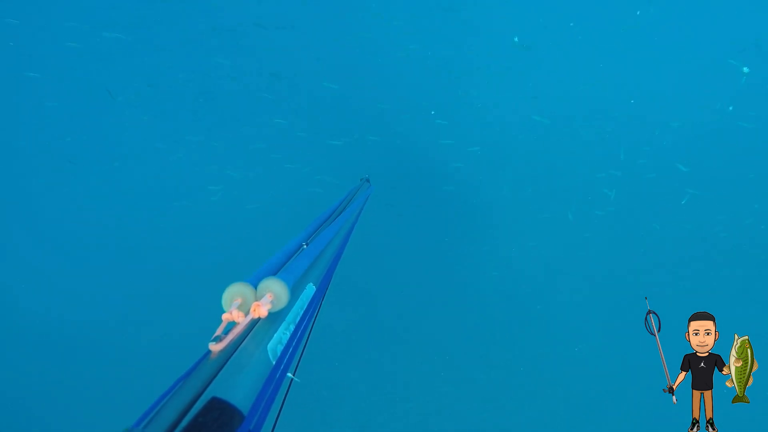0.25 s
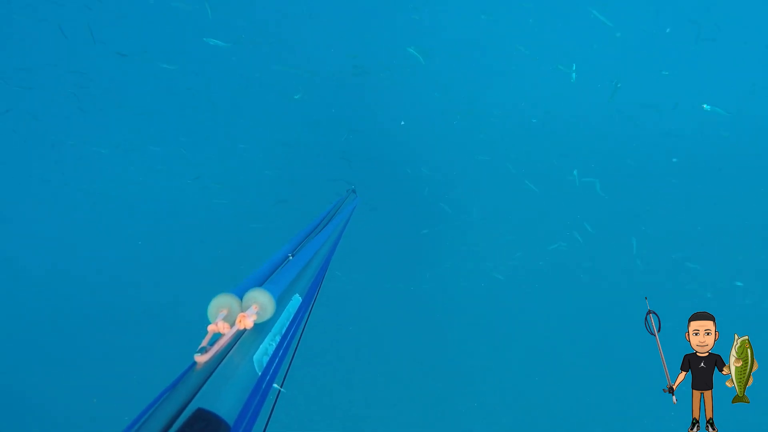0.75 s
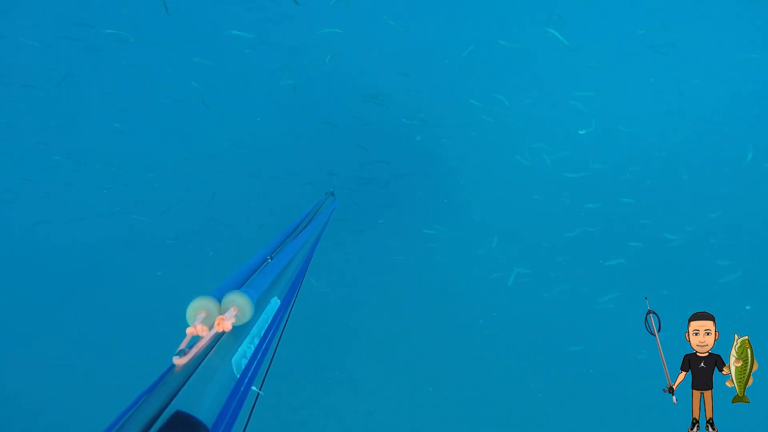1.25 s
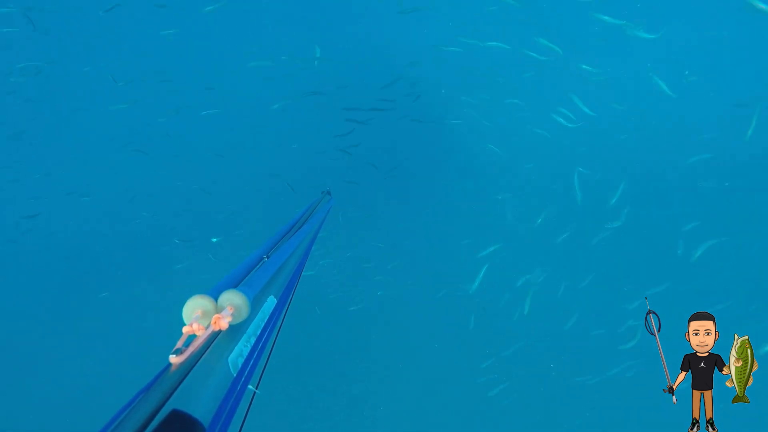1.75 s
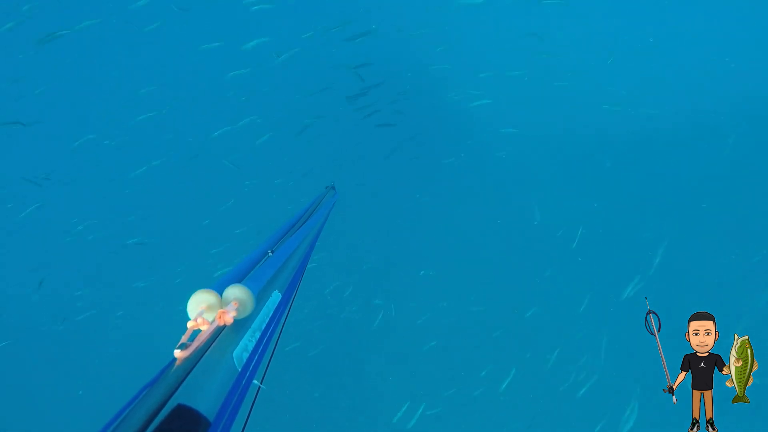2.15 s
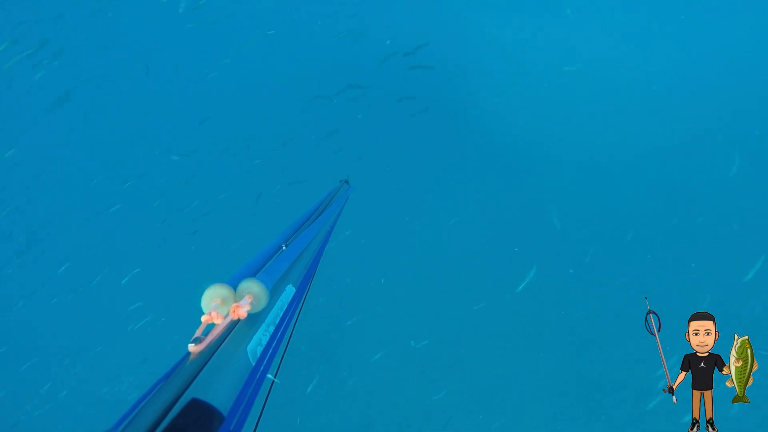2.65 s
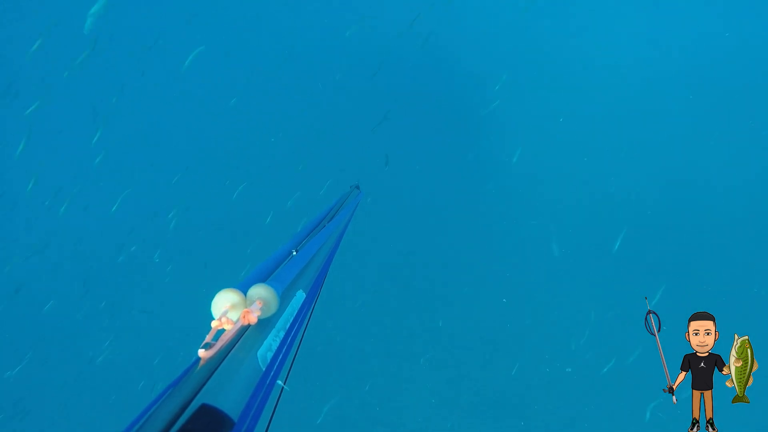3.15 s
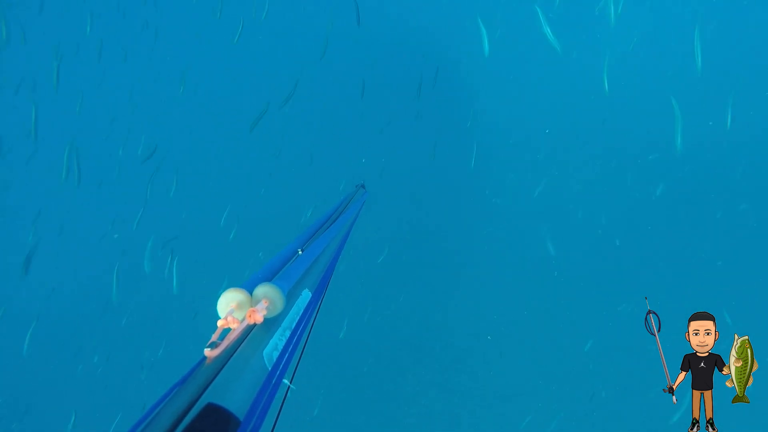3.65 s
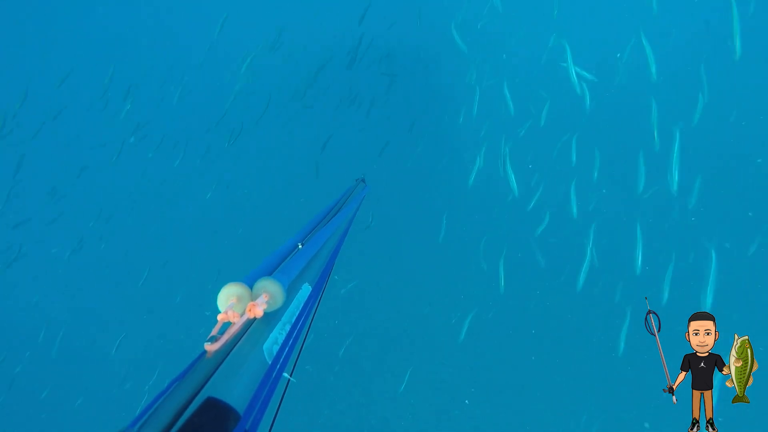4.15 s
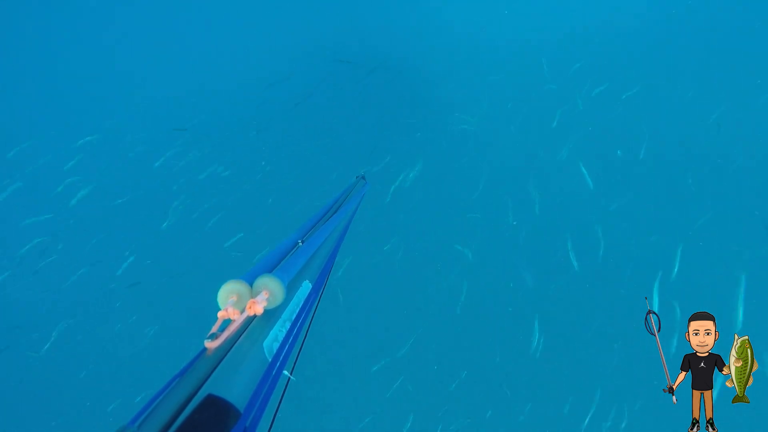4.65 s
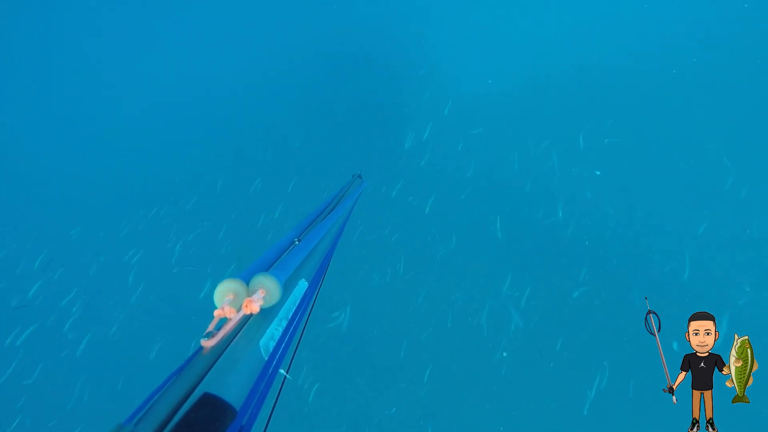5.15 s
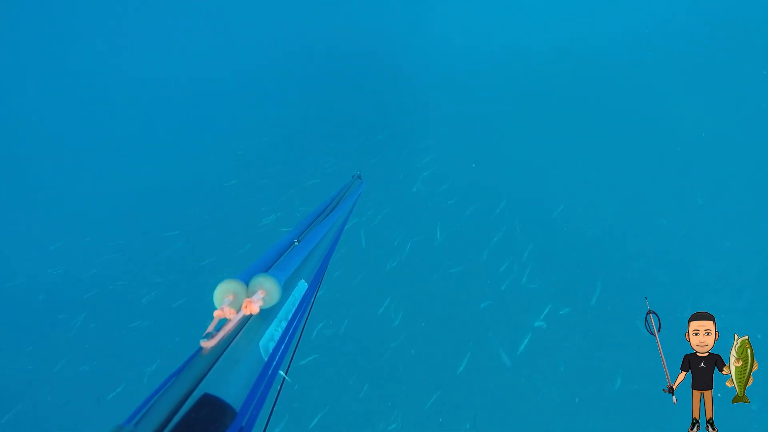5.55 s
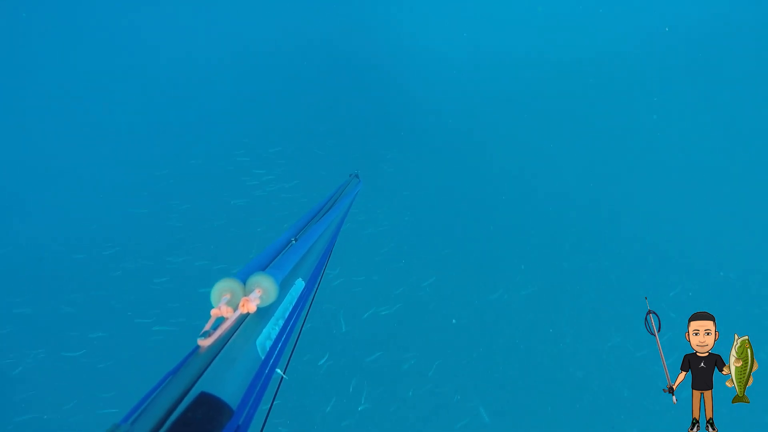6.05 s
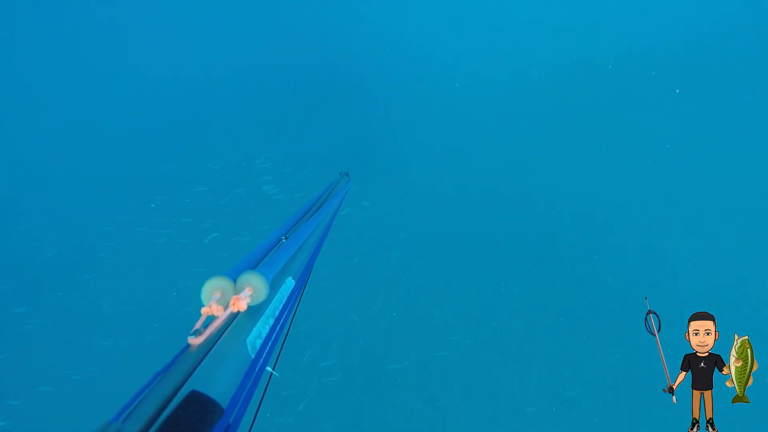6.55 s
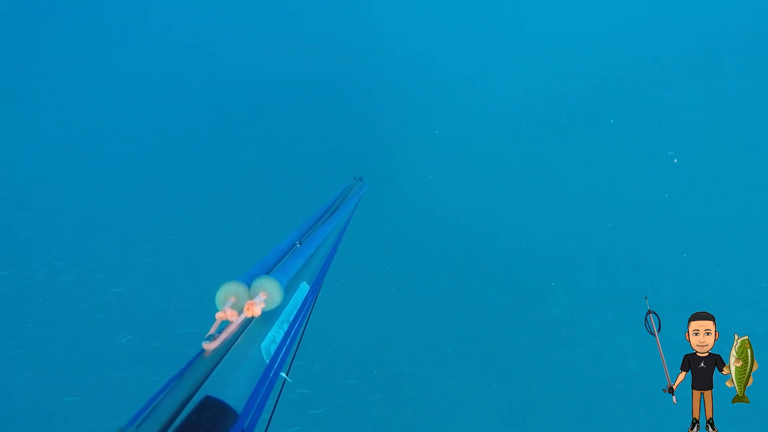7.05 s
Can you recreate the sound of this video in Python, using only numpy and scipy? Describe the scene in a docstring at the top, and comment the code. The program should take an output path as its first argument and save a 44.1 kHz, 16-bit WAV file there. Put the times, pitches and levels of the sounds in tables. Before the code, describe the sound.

A motorboat approaches, heard from below the surface: deep pulsing drone, hollow mechanical rattle, fine sea crackle and a few soft bumps close by.

```python
"""Boat engine under water

A four-cylinder boat engine comes nearer, unevenly, heard through the case of a diver's camera.
Firing pulses through an exhaust filter make a throbbing boom; knocks and grit make a clatter that rings the case.
Sliding echo combs colour the clatter. Shrimp snaps are short noise cracks over a fizz of merged far snaps.
The diver's gear knocks in decaying sines; filtered noise makes water rumble, shoves and a faint sea wash."""
import sys
import numpy as np
from scipy import signal
from scipy.fft import rfft, irfft
from scipy.io import wavfile
from scipy.ndimage import uniform_filter1d

SR = 44100
rng = np.random.default_rng(int(sys.argv[2]) if len(sys.argv) > 2 else 0)


def log_audio(samples):
    """Write samples as a 16-bit WAV file to the path given in sys.argv[1]."""
    # one column per channel
    frames = np.atleast_2d(samples).T
    # limit to full scale, then quantise
    limited = np.clip(frames, -1, 1)
    pcm = np.round(limited * 32767).astype(np.int16)
    wavfile.write(sys.argv[1], SR, pcm)


N = 321489
TIME = np.arange(N) / SR
FREQ = np.maximum(np.arange(N // 2 + 1) * SR / N, 1)

# exhaust pipe and bubble resonances: f/Hz, level/dB
EXHAUST = [(15, -49.5), (50, -12), (70, -7.5), (86, -20.5), (95, 3), (106, 3), (121, 5), (134, 2),
           (146, -26), (163, -1.5), (186, -18), (218, -19), (255, -32), (400, -79), (2000, -120)]
# hum throb: t/s, imbalance of the cycle halves (signed), heavy point/cycles
THROB = [(0, .65, -.08), (.35, .8, -.18), (.6, .7, -.1), (.8, -.1, -.15), (1.05, .7, -.21),
         (1.33, .6, -.12), (1.55, -.85, -.13), (1.85, -.5, -.03), (2.1, -.8, -.09), (2.35, .45, -.11),
         (2.6, .35, -.06), (2.85, .75, -.14), (3.2, .7, -.12), (3.4, -.15, -.1), (3.68, 1.2, -.1),
         (4, -.6, -.02), (4.3, -.3, .08), (4.6, -.38, .19), (4.92, 0, .15), (5.3, -.42, .1),
         (5.6, .15, .15), (6.0, .6, .27), (6.24, 0, .17), (6.5, 1.3, .11), (6.7, .7, .15),
         (6.93, -1.15, .18), (7.12, .7, .19)]
# exhaust boom: t/s, level/dB, f favoured by the bubble cloud/Hz
BOOM = [(0, -36, 115), (.58, -44, 111), (.9, -35, 108), (1.7, -35, 111.5), (2.6, -30.5, 111),
        (3.05, -27.5, 113.4), (3.4, -27, 113.6), (4.2, -29, 107), (4.7, -25, 100.6), (5.15, -24, 111),
        (5.5, -22, 113), (5.82, -19.5, 118.5), (6.17, -26, 118), (6.5, -24.5, 112), (7.29, -22, 110)]


def boom(turn, lope=0.44, trim_db=0.0):
    """Exhaust pulses ring the pipe; they lope strong and weak, and unequal cycle halves make the hum throb."""
    times, cylinder = firings(turn, early_cycles=0.034)
    jitter_s, scatter_db = .00013, .4
    imbalance, heavy_point = curves(THROB)
    boom_db = curves(BOOM)[0]
    time_chance, size_chance = rng.standard_normal((len(times), 2)).T
    throb = np.interp(times, TIME, imbalance * np.cos(2 * np.pi * (turn - heavy_point)))
    weight = 1 + 2 * throb + lope * (-1) ** cylinder
    beats = pulses(times + jitter_s * time_chance, weight * undb(scatter_db * size_chance))
    hum = sweep(colour(beats, EXHAUST), bubble_cloud_db, size=8192)
    # a deep throb carries no more power than a smooth hum
    hum = hum / np.sqrt(uniform_filter1d(hum ** 2, size=SR // 2))
    return ports(level(hum, trim_db) * undb(boom_db), 90)


def bubble_cloud_db(s, hz, lift_db=6.5, width_hz=9.1):
    """The exhaust bubble cloud changes size and lifts now one partial of the hum, now its neighbour."""
    return lift_db * bell(hz, curves(BOOM, s)[1], width_hz)


# the four firings of a cycle: clatter level/dB
CYLINDERS = [0, -16, 1.5, -5.5]
# even propeller wash between firings: t/s, strength/share of a firing's burst
WASH = [(0, .35), (1, .16), (1.5, .2), (1.9, .08), (3.3, .07), (3.8, .3), (4.7, .28), (5.7, .17),
        (6.2, .08), (6.9, .09), (7.29, .2)]
# narrow ring swelling out of the clatter: t at height/s, length/s, f/Hz, width/Hz, level/dB
RING_OUT = (6.76, 0.25, 1950, 85, -36.3)
# thud of one cylinder close by: t at height/s, length/s, f/Hz, width/Hz, level/dB
THUD = (6.5, 0.66, 547, 199, -43)


def clatter(turn, knock_db=13.5, fade_s=0.018):
    """Each firing knocks and bursts in grit, partly alike every cycle, over propeller wash; all ring the case."""
    early_cycles, scatter_db = .125, 1.6
    recurring_power, grit_per_cycle = .52, 3000
    times, cylinder = firings(turn, early_cycles)
    sizes = undb(np.array(CYLINDERS)[cylinder] + scatter_db * rng.standard_normal(len(times)))
    kicks = pulses(times, sizes)
    knocks = undb(knock_db) * kicks
    bursts = curves(WASH)[0] + signal.lfilter([1], [1, -np.exp(-1 / (fade_s * SR))], kicks)
    pattern = rng.standard_normal(grit_per_cycle)[(turn % 1 * grit_per_cycle).astype(int)]
    fresh = rng.standard_normal(N)
    grit = np.sqrt(recurring_power) * pattern + np.sqrt(1 - recurring_power) * fresh
    struck = bursts * grit + knocks
    whine = passing(bursts * rng.standard_normal(N) + knocks, *RING_OUT)
    thud = passing(pulses(times, cylinder == np.argmax(CYLINDERS)), *THUD)
    return ports(sweep(case(struck), sea_paths_db, size=2048) + whine + thud, FREQ)


# carry of the clatter: t/s, level/dB, tilt/(dB/octave)
CLATTER = [(0, -51, 0.5), (.7, -49, 0.5), (1.4, -44.5, 0), (1.95, -41.5, -0.5), (2.4, -45, 0.5),
           (3.1, -43.5, -1), (4.2, -49.5, -1), (5, -51, -1.5), (5.7, -45.5, 1.5), (6.4, -40, 0.5),
           (6.9, -41, -1.5), (7.29, -40, -5.5)]
# echoes off the waves overhead (short, long path) and off the seabed: t/s, lag/ms, comb depth/dB
SHORT_ECHO = [(0, 1, 3.5), (.9, 0.55, 0), (1.5, 0.29, 1.5), (3.1, 0.28, 5), (3.55, 0.3, -1.3),
              (4.0, 0.73, 2.5), (4.7, 0.45, -1), (5.3, 0.45, 3.5), (6, 0.28, 1.7), (6.6, 0.58, 1)]
LONG_ECHO = [(0, 1.49, 4.3), (1.0, 1.63, 1.4), (1.9, 1.94, 2.9), (2.5, 1.84, 0.36), (3.15, 1.73, 2.8),
             (3.8, 2.09, 2.3), (4.35, 2.2, 7.3), (5, 2.02, 2.5), (5.2, 1.33, 0.85), (5.6, 1.04, 2.7),
             (6, 1.07, 1.6), (6.5, 0.85, 0.79), (6.9, 0.63, 2.8), (7.29, 0.57, 3.6)]
SEABED_ECHO = [(0, 5, 0.82), (2, 2.9, 0.17), (4, 2.62, 1), (5.1, 2.7, 3.5), (5.5, 4.16, 0.87),
               (6.3, 3.66, 2.8), (7.29, 4.8, 1.6)]
# clatter bands that swell or sink: t at height/s, length/s, f/Hz, width/Hz, lift/dB
SWELLS = [(1.94, .35, 2550, 140, 0), (2.198, 0.9, 426, 49.6, 5.5), (1.8, 0.42, 322, 50, -6.5),
          (2.1, 0.54, 856, 60, 4.5), (2.3, 0.32, 2380, 110, 3.5), (3.95, 0.22, 1710, 200, -0.5),
          (4.11, 0.14, 2560, 170, 4.5), (4.05, 0.42, 1005, 100, -14), (5.2, 0.78, 1150, 70.5, 13),
          (6.098, 0.22, 560, 90, 3), (6.099, .25, 980, 71, -14), (6.103, 0.25, 1370, 132, 3),
          (6.85, 0.27, 1020, 199, 3.5), (7.18, 0.098, 1000, 216, 6)]
# weaker paths, shortening steadily: shortest and longest lag, glide, comb depth
RIPPLE_LAG_MS, RIPPLE_GLIDE_PER_S, RIPPLE_DB = (3, 10), .08, 1.1


def sea_paths_db(s, hz, pivot_hz=1000):
    """Distance sets level and tilt; echoes comb the sound, and their notches slide as the boat moves."""
    def comb(lag_ms, depth_db):
        return depth_db * np.cos(2 * np.pi * hz * lag_ms / 1000)

    carry_db, tilt_db = curves(CLATTER, s)
    # minus: the waves reflect inverted
    echoes = comb(*curves(SEABED_ECHO, s)) - comb(*curves(SHORT_ECHO, s)) - comb(*curves(LONG_ECHO, s))
    lags_ms = rng.uniform(*RIPPLE_LAG_MS, size=6)
    ripples = sum(comb(lag * np.exp(-RIPPLE_GLIDE_PER_S * s), RIPPLE_DB) for lag in lags_ms)
    swells = sum(db * bell(s, at, length) * bell(hz, centre, width)
                 for at, length, centre, width, db in SWELLS)
    tilt = tilt_db * np.log2(np.maximum(hz, CASE[0][0]) / pivot_hz)  # flat below the lowest case mode
    return carry_db + tilt + echoes + ripples + swells


def firings(turn, early_cycles):
    """Times and cylinder numbers of the firings, four to a cycle."""
    count = np.arange(1, int(turn[-1] * len(CYLINDERS)))
    return np.interp(count / len(CYLINDERS) - early_cycles, turn, TIME), count % len(CYLINDERS)


# snap colour: f/Hz, level/dB
SNAP_COLOUR = [(1000, 9), (2900, 6.5), (4100, 0), (4900, -0.5), (5450, 5.5), (6400, -3.5), (7500, 4),
               (8100, -3.5), (9000, -5.5), (9700, -5), (11000, -12.5), (13000, -16.5), (14300, -43)]
# near snaps: t/s, level before near_db/dB, f favoured/Hz, left minus right/dB
NEAR_SNAPS = [(0.057, -36, 7010, -7), (0.1495, -28.5, 4660, -2.5), (1.1933, -40, 7890, 2),
              (1.3571, -44, 5550, -5), (1.785, -42, 3730, 0), (1.9197, -27.5, 4700, -1),
              (2.0885, -34.5, 6300, -3), (2.253, -36, 7310, -8), (2.2673, -38, 5400, 1),
              (2.3346, -38, 5350, 2), (2.5871, -40, 7630, -3), (2.624, -41.5, 5550, -5),
              (3.554, -39.5, 5270, -2), (3.8234, -40, 6930, -5), (3.911, -39, 6500, -7),
              (4.2415, -32.5, 4600, -4), (4.8428, -43.5, 5450, 7), (4.8488, -32.5, 5420, -5),
              (4.919, -35, 3400, 7), (5.1244, -40, 5150, -12), (5.36, -41.5, 7500, -2),
              (5.498, -41.5, 4670, -3), (5.7864, -38.5, 7400, 4), (5.8651, -35, 7680, -1),
              (6.0392, -40.5, 7090, -7), (6.0988, -38, 5500, -9), (6.166, -32.5, 6000, -3),
              (6.32, -44, 5310, -4), (6.419, -34.5, 7260, 0), (6.4645, -33, 4070, -2),
              (6.549, -44, 5150, -11), (7.189, -34.5, 7100, -3)]


def shrimp(far_db=-52.0, middle_db=-42.0, near_db=10.5, fizz_pan_db=-2.5):
    """Far snaps merge into a fizz, closer ones crackle, the nearest stand out."""
    near = np.array(NEAR_SNAPS) + [0, near_db, 0, 0]
    crackle = snaps(np.vstack([near, colony(per_s=70, faintest_db=middle_db, spread_db=3.)]))
    fizz = level(colour(rng.standard_normal((2, N)), SNAP_COLOUR), far_db)
    fizz_sides = undb(np.array([[.5], [-.5]]) * fizz_pan_db)
    return colour(crackle, SNAP_COLOUR) + fizz * fizz_sides


# band centres of the snap spectrum: f/Hz
SNAP_BANDS_HZ = [3000, 5500, 8000, 12000]


def colony(per_s, faintest_db, spread_db, pan_db=-3.0):
    """Rows of snaps at random moments, most of them faint, each with its own colour and side."""
    when, size, pitch, side = rng.random((int(per_s * N / SR), 4)).T
    db = faintest_db - spread_db * np.log(np.maximum(size, .02))
    favoured_hz = np.interp(pitch, [0, 1], [SNAP_BANDS_HZ[0], SNAP_BANDS_HZ[-1]])
    return np.transpose([when * N / SR, db, favoured_hz, pan_db + 10 * (side - .5)])


def snaps(rows, focus_db_per_oct=10.5):
    """Each snap is a very short crack in its own colour, then a faint diffuse tail from the seabed."""
    crack_s, tail_s, tail_db = .0007, .014, -15

    def fading(power, seconds):
        return signal.lfilter([1], [1, -np.exp(-2 / (seconds * SR))], power + 1e-18)

    s, db, favoured_hz, pan_db = np.transpose(rows)
    spectrum = 0
    for hz, own in zip(SNAP_BANDS_HZ, np.eye(len(SNAP_BANDS_HZ))):
        band_db = db - focus_db_per_oct * abs(np.log2(hz / favoured_hz))
        power = np.array([pulses(s, undb(band_db + side * pan_db / 2) ** 2) for side in (1, -1)])
        envelope = np.sqrt(fading(power, crack_s) + undb(tail_db) ** 2 * fading(power, tail_s))
        band_gain = np.sqrt(np.interp(FREQ, SNAP_BANDS_HZ, own))  # bands crossfade in power
        spectrum = spectrum + rfft(envelope * rng.standard_normal((2, N))) * band_gain
    return irfft(spectrum, N)


# dull gear knocks: t/s, level/dB, f favoured by the contact/Hz, ring length/multiple of t60
KNOCKS = [(.338, -19.5, 643, .4), (.3405, -14.5, 325, .6), (.411, -22, 880, .6), (0.4134, -13, 447, .8),
          (0.752, -31.5, 306, .7), (0.827, -35, 283, .7), (1.068, -20.5, 185, .75), (1.075, -28.5, 220, .5),
          (3.422, -20.5, 540, .4), (3.425, -17, 137, .5), (3.446, -26.5, 190, .9), (3.617, -32, 297, 1.8),
          (4.03, -33.5, 267, 1.2), (4.592, -25.5, 676, 1.1), (4.872, -37, 696, 2), (4.955, -36, 710, 3),
          (5.576, -31.5, 352, .8), (6.694, -20, 216, .9), (6.713, -21, 270, 1.8), (6.729, -28, 200, .95),
          (6.785, -33, 300, 1.2), (6.832, -19.5, 564, 1), (6.87, -29, 294, .9), (7.123, -28, 326, 1.9)]
# modes a knock rings: f/Hz, level/dB, t60/s
KNOCK_MODES = [(137, 1.5, 0.24), (193.3, 1, 0.17), (297, 1.5, 0.067), (464.4, 0.5, 0.044),
               (700, -0.5, 0.036), (920, -4, 0.025)]
# light taps on metal: t/s, peak level/dB, f/Hz, t60/s
TAPS = [(3.621, -24, 2940, 0.0088), (3.624, -51, 3240, 0.15), (6.464, -33, 2940, 0.014)]


def gear(rise_s=0.0019, focus_db_per_oct=20.5, weakest_db=-35.0):
    """Soft knocks bend the case, stirring most the modes near their own pitch; taps on metal ring higher."""
    knocks = 0
    for hz, mode_db, t60 in KNOCK_MODES:
        mode = 0
        for s, db, favoured_hz, length in KNOCKS:
            stir_db = max(-focus_db_per_oct * abs(np.log2(hz / favoured_hz)), weakest_db)
            mode = mode + blow(s, db + mode_db + stir_db, hz, t60 * length, rise_s)
        knocks = knocks + ports(mode, hz)
    return knocks + sum(blow(s, db, hz, t60, rise_s=0.00085) for s, db, hz, t60 in TAPS)


def blow(s, db, hz, t60, rise_s):
    """A struck mode that swells during the contact and dies away."""
    age = TIME[:SR // 4]
    shape = (1 - np.exp(-(age / rise_s) ** 2)) * np.exp(-np.log(1000) * age / t60)
    tone = undb(db) * shape / shape.max() * np.sin(2 * np.pi * hz * age)
    return np.pad(tone, (int(s * SR), N))[:N]


# water rumble: f/Hz, level/dB
RUMBLE = [(8, -28.5), (20, -7), (30, 2), (45, -13.5), (80, -3.5), (140, -9), (240, -29.5), (295, -25),
          (380, -40.5), (1000, -36.5), (3000, -52), (12000, -106)]
# water pushing on the case: t/s, level/dB, length/s
SURGES = [(0.359, -24, 0.011), (0.424, -27.5, 0.089), (1.143, -28, 0.043), (6.642, -23, 0.1)]


def water(rumble_db=-32.5, surge_hz=24, surge_width_hz=30):
    """Flow rumbles along the case and now and then gives it a slow shove."""
    rumble = level(colour(rng.standard_normal(N), RUMBLE), rumble_db)
    shove = sum(undb(db) * bell(TIME, s, length) for s, db, length in SURGES)
    push = level(ring(rng.standard_normal(N), surge_hz, surge_width_hz), 0)
    return ports(rumble + shove * push, surge_hz)


def sea_wash(wash_db=-50.5):
    """The sea's steady noise keeps the case ringing faintly, its upper modes lifted by a tilt."""
    return ports(undb(wash_db) * case(rng.standard_normal(N), tilt_db=8.0, pivot_hz=2820), FREQ)


# camera case modes: f/Hz, width/Hz, level/dB
CASE = [(294, 85, -13), (489, 69, -9.5), (555, 111, -7.5), (700, 185, -3.7), (804, 100, -5.2),
        (992, 130, -7.5), (1325, 190, .5), (1515, 225, -.3), (1796, 136, -5.5), (1917, 164, .5),
        (2275, 280, -7.5), (2543, 183, -13.5), (2756, 190, -9.5), (3053, 233, -21), (3232, 337, -17)]


def case(x, tilt_db=0, pivot_hz=1000):
    """All modes of the camera case ring together, each at its own level; tilt in dB per octave."""
    power = 0
    for hz, width, db in CASE:
        mode_power = undb(db + tilt_db * np.log2(hz / pivot_hz)) ** 2 / width
        power = power + mode_power / (1 + ((FREQ / hz - hz / FREQ) * hz / width) ** 2) ** 2
    return colour(level(x, 0), np.transpose([FREQ, 10 * np.log10(power * 2 * SR / np.pi)]))


# case to the two microphones: f/Hz, left minus right/dB, left lead/rad
SIDES = [(110, -1, -.2), (294, -1.5, -.5), (500, -6, -1.2), (600, -9, -1.7), (820, -10, -2.9),
         (950, -2, -2.4), (1080, -1, -1.9), (1200, 8, -4.1), (1350, 8, -3.7), (1480, 5, -4),
         (1550, 1, -3.9), (1650, -8, -3.7), (1850, -7.5, -4.5), (2000, -6, -4.3), (2340, 4, -3.7),
         (2480, 5, -.7), (2690, -4, -.1), (3000, -1, -.1), (3340, 4, 1.3)]


def ports(x, hz):
    """The flexing case reaches the two microphones with unlike strength and phase."""
    side_hz, pans_db, leads = np.transpose(SIDES)
    ratio = undb(np.interp(hz, side_hz, pans_db) / 2) * np.exp(.5j * np.interp(hz, side_hz, leads))
    gain = np.vstack([ratio, 1 / ratio])
    return irfft(rfft(x) * gain / np.sqrt(np.mean(abs(gain) ** 2, axis=0)), N)


def undb(db):
    """Decibels to gain."""
    return 10 ** (np.asarray(db) / 20)


def level(x, db):
    """Scale to an rms level."""
    return x * undb(db) / np.sqrt(np.mean(x ** 2))


def curves(table, at=TIME):
    """Each column after the first as a control, linear between the times."""
    s, *columns = np.transpose(table)
    return [np.interp(at, s, c) for c in columns]


def bell(x, centre, spread):
    """A smooth hump of height 1; spread is its standard deviation."""
    return np.exp(-.5 * ((x - centre) / spread) ** 2)


def pulses(times, sizes):
    """One impulse at each time."""
    return np.bincount(np.clip(np.asarray(times) * SR, 0, N - 1).astype(int), sizes, N)


def walk(per_s):
    """A slow random wander with a spread near 1."""
    k = int(SR / per_s)
    steps = np.repeat(rng.standard_normal(N // k + 1), k)
    return 1.3 * uniform_filter1d(uniform_filter1d(steps, k), k)[:N]


def ring(x, hz, width):
    """A resonance applied twice, for steep skirts."""
    return irfft(rfft(x) / (1 + 1j * (FREQ / hz - hz / FREQ) * hz / width) ** 2, N)


def passing(x, s, length, hz, width, db):
    """A resonance that swells and fades as the boat moves."""
    return level(ring(x, hz, width), db) * bell(TIME, s, length)


def colour(x, points):
    """Causal filter through (Hz, dB) points, from the cepstrum of the log gain."""
    hz, db = np.transpose(points)
    log_gain = np.log(undb(np.interp(np.log(FREQ), np.log(hz), db)))
    cepstrum = irfft(log_gain, N)
    fold = 1 + np.sign(N / 2 - np.arange(N)) * (np.arange(N) > 0)  # minimum phase
    return irfft(rfft(x) * np.exp(rfft(cepstrum * fold)), N)


def sweep(x, gain_db, size):
    """A filter that changes with time; gain_db(s, hz) gives its shape."""
    hz, s, frames = signal.stft(x, SR, nperseg=size)
    gain = undb(gain_db(s, np.maximum(hz, 1)[:, None]))
    return signal.istft(frames * gain, SR, nperseg=size)[1][:N]


# engine speed: t/s, rate/(working cycles/s)
SPEED = [(0.0, 14.27), (0.5, 13.63), (1.26, 13.84), (1.8, 13.22), (2.7, 13.18), (3.05, 13.93), (3.5, 13.38),
         (3.8, 13.51), (4.3, 12.65), (5.12, 11.71), (5.65, 13.39), (6.1, 13.57), (7.29, 14.23)]


def scene():
    """The engine's slightly unsteady turning drives boom and clatter, amid the sea's own sounds."""
    waver_cycles, waver_per_s = .006, 5
    turn = np.cumsum(curves(SPEED)[0]) / SR + waver_cycles * walk(waver_per_s)
    return boom(turn) + clatter(turn) + shrimp() + gear() + water() + sea_wash()


TOP_HZ = 14250


def record(dry):
    """The camera cuts the top with a steep low-pass."""
    return signal.sosfilt(signal.ellip(10, .2, 80, TOP_HZ, fs=SR, output="sos"), dry)


dry = scene()
out = record(dry)
log_audio(out)
```